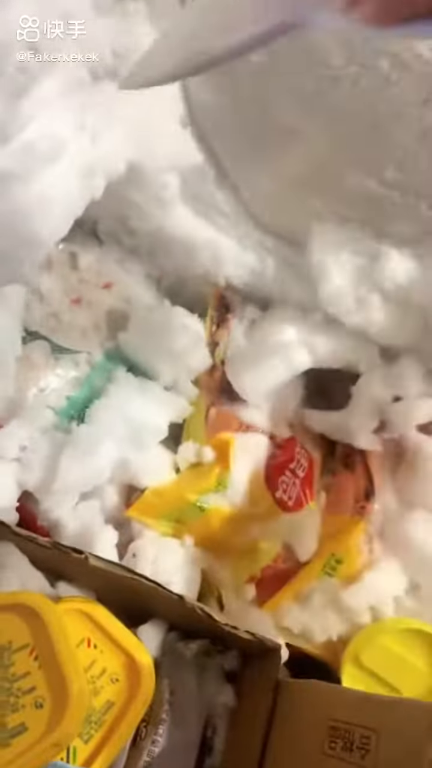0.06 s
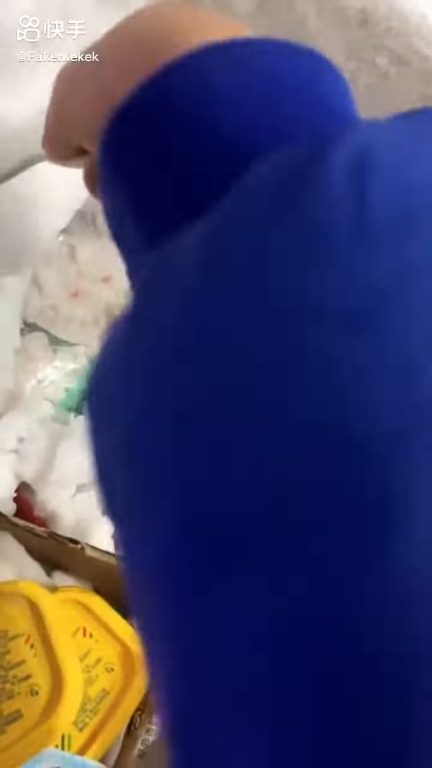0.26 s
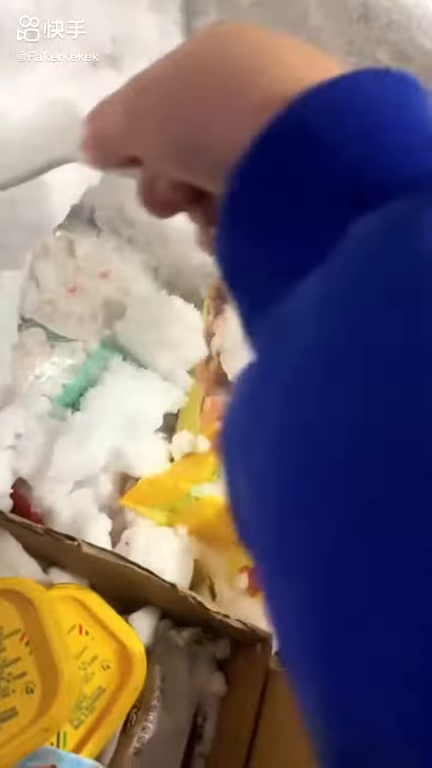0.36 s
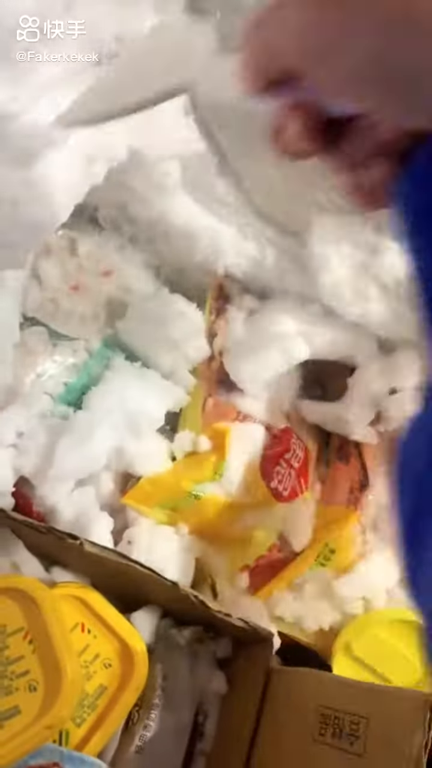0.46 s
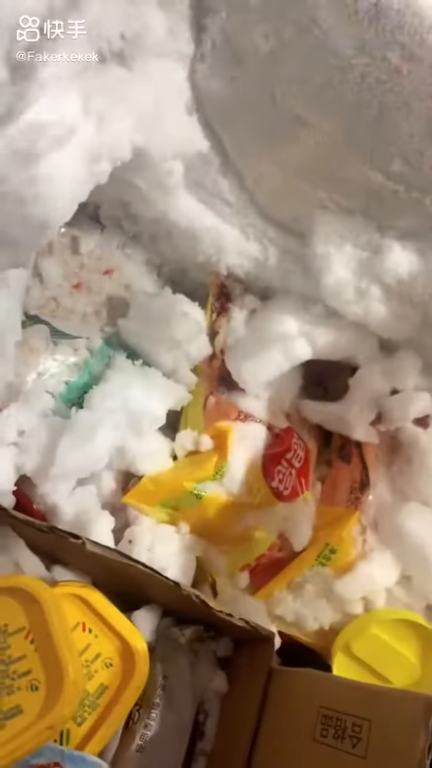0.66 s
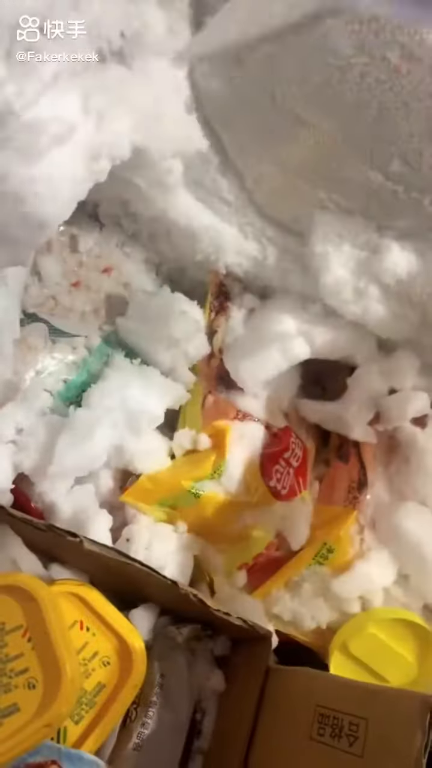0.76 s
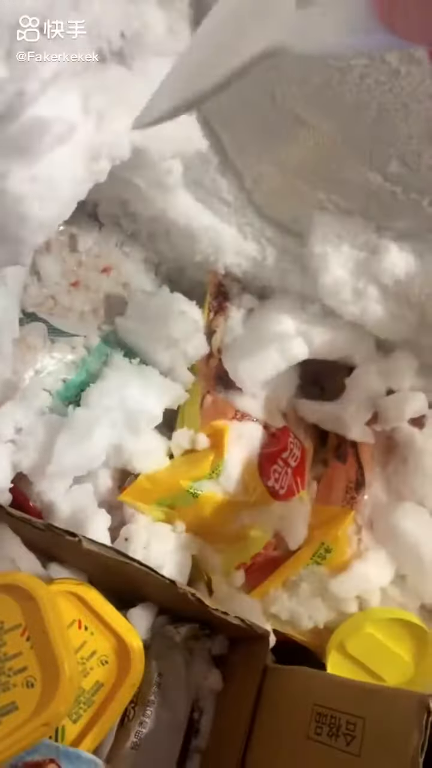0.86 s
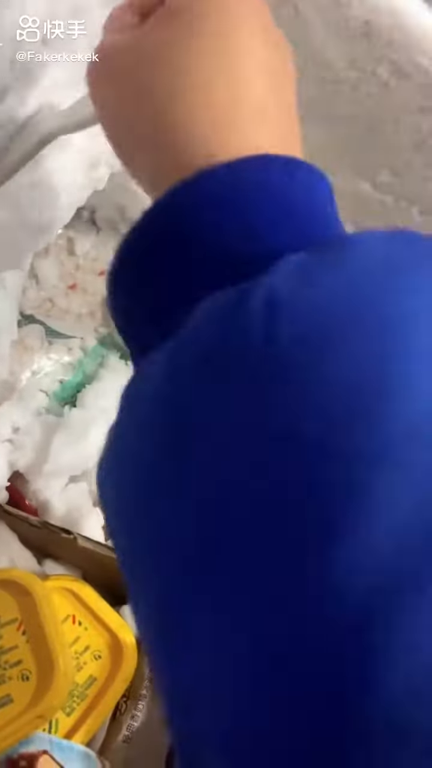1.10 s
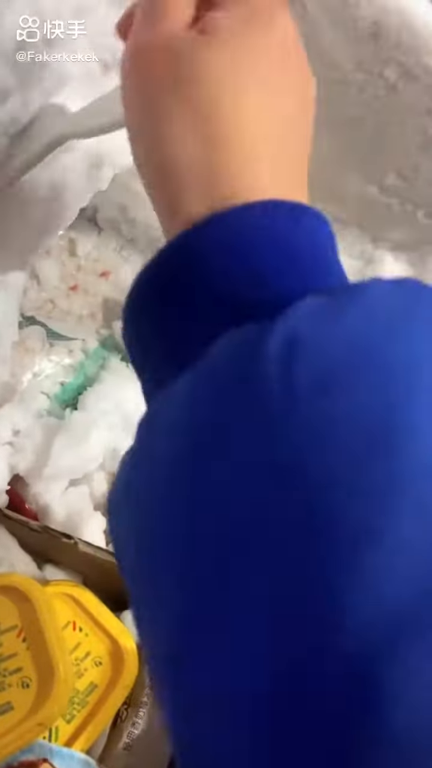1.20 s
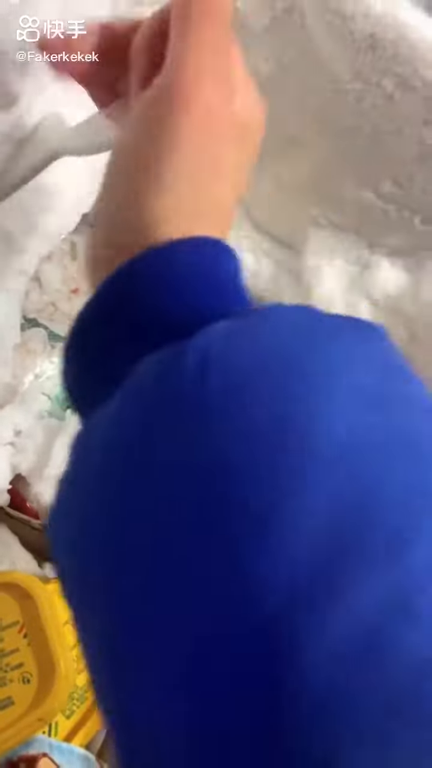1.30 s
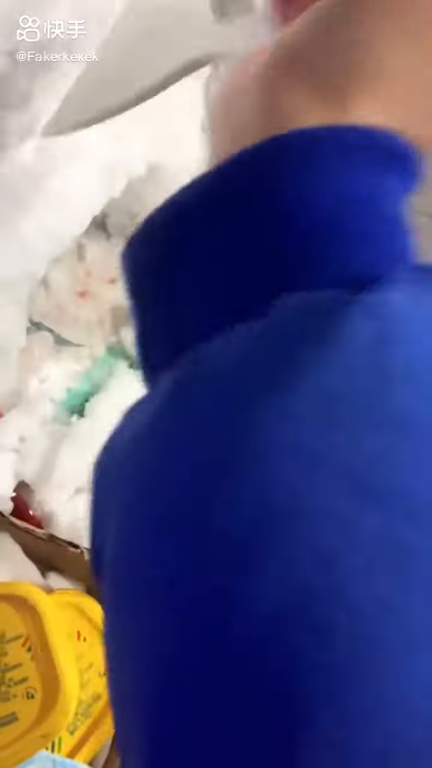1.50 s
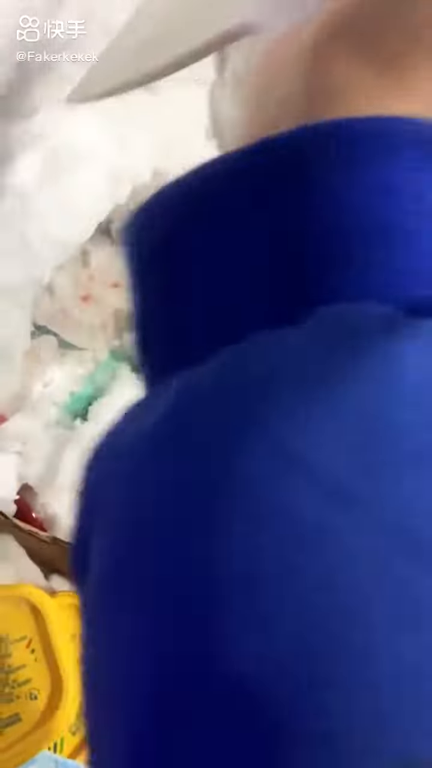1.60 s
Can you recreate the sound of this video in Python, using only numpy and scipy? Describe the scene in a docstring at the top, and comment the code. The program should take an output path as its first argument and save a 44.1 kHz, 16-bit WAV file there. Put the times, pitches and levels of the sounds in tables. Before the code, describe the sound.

A plastic scraper crunches frost inside a freezer, very close to a phone microphone; a sharp jab knocks the liner with a low boom, grinding fades to a pause, then another jab and crunchy drags.

```python
"""A plastic scraper works on thick frost inside a chest freezer, heard close by a phone's two ports.
First comes crunching from thousands of random snaps, then a hard jab knocks the liner and the wall booms.
More grinding leads to a pause: crumbs trickle, a thin whine passes and the cabinet hums low.
A second jab and crunchy drags follow, then it quietens. Clicks and noise make the liner and wall ring;
a faint hiss runs throughout."""
import sys
import numpy as np
from scipy import signal
from scipy.fft import rfft, irfft, next_fast_len
from scipy.io import wavfile

SR = 44100
rng = np.random.default_rng(int(sys.argv[2]) if len(sys.argv) > 2 else 0)


def digitize_waveform(pressure):
    """Quantize a signal to 16-bit integers and store it at the path in sys.argv[1].

    Rows of a 2-D input are taken as channels; values are limited to [-1, 1].
    """
    field = np.atleast_2d(pressure).T
    bounded = np.clip(field, -1, 1)
    quanta = np.round(bounded * 32767).astype(np.int16)
    wavfile.write(sys.argv[1], SR, quanta)


N = 72765  # length in samples

# The edge crushing frost: time_s, crunch_level_db, treble_above_4khz_db, blade_ring_db
STROKES = [(0, -32.5, -0.5, -5), (.012, -31.5, 0.5, -11.5), (.036, -44.5, 9.5, -2.5), (.2, -45, 1.5, -7),
           (.228, -36.5, -4.5, -6), (.237, -19.5, 3.5, -19.5), (.25, -19.5, 5, 2), (.262, -27, -13, -13),
           (.28, -38, -1, 0), (.302, -36, 1.5, -2), (.328, -49.5, 7, -3), (.352, -42, 8.5, -2),
           (.39, -34.5, 3, -6), (.425, -38, 3, -7.5), (.45, -44.5, 3.5, -5), (.52, -52, 7.5, 0),
           (.65, -55.5, 2, 4), (.75, -51, 2, 1), (.81, -47, -15, -4.5), (.87, -56.5, -17, 4),
           (1.06, -60, -6, 4.5), (1.092, -54, 12.5, 12), (1.099, -23.5, 5.5, -1.5), (1.128, -25.5, 6, -6),
           (1.14, -30, 4, 6), (1.17, -34, 0.5, -17), (1.21, -35.5, -1, -2.5), (1.25, -37, -1, 0),
           (1.268, -47.5, 7, 0.5), (1.3, -45, 11, -17), (1.36, -39.5, 8.5, -10), (1.39, -37, 8.5, -1),
           (1.408, -35.5, 9.5, 6), (1.445, -33, 1, -3), (1.475, -31.5, 5.5, -6.5), (1.515, -31, 4, -10),
           (1.53, -45.5, 4, -21), (1.58, -52.5, -3.5, -22), (1.65, -54, 6, 1)]
# Colour of snapping frost: pitch_hz, level_db (per Hz)
FROST_COLOUR = [(500, -1), (900, 1), (1400, 4.5), (2500, 0.5), (4000, -2.5), (6000, -8.5), (9000, -7),
                (12000, -10.5), (13100, -9.5), (13800, -37)]
# What the plastic blade rings with: pitch_hz, level_db, fade_by_60db_s
BLADE_MODES = [(854.4, 5.5, 0.064), (1416, -0.5, 0.17), (1370, -20.5, 0.049), (1705, -2.5, 0.086),
               (2174, 5.5, 0.026), (3350, 0, 0.066), (4050, -19, 0.0067)]
SNAPS_PER_S, SNAP_SPREAD_DB = 9000, 2.5
# Crusts give way in bursts that start sharply and die; level is over the even grind
BURSTS_PER_S, BURST_T60_S, BURST_DB = 200, .015, -10
# Each crystal size comes and goes on its own
PATCH_DEPTH_DB, PATCH_RATE_HZ = 2.4, 16

# Small chips break free at random under the edge; their level is relative to the crunch
CHIPS_PER_S, CHIP_CYCLES, CHIPS_DB = 250, 80., -2
CHIP_LOW_HZ, CHIP_HIGH_HZ = 1000., 9000.

# Single loud cracks of ice, each freeing a chip: start_s, burst_level_db, chip_pitch_hz, chip_ring_db
ICE_CRACKS = [(.2358, -15, 2216, -20), (.2385, -14, 1702, -19), (.2485, -16, 7480, -22),
              (.302, -26, 4700, -36), (.347, -34, 6100, -42), (.375, -40, 1500, -38),
              (.682, -39, 6200, -50), (.7262, -30, 6700, -42), (.7497, -42, 6600, -48),
              (1.0985, -14, 3895, -24), (1.101, -24, 6950, -26), (1.104, -30, 2280, -28),
              (1.110, -32, 1660, -28), (1.116, -34, 885, -30), (1.141, -27, 1400, -34),
              (1.2155, -32, 1470, -38), (1.242, -29, 1540, -32), (1.2835, -34, 2300, -44),
              (1.3118, -37, 2110, -42), (1.3986, -27, 1630, -34), (1.4101, -32, 1420, -26),
              (1.462, -34, 1450, -30), (1.479, -32, 2200, -32), (1.501, -25, 2300, -30),
              (1.5145, -26, 1850, -29)]
CRACK_T60_S, CRACK_ABOVE_HZ, CRACK_CHIP_T60_S = .008, 3000., .06

# What the plastic liner rings with: pitch_hz, level_db, fade_by_60db_s
LINER_MODES = [(178, -5, 0.047), (226, -2.5, 0.061), (301.3, -1, 0.035), (408, -4, 0.048),
               (491, -5.5, 0.033), (605.5, -1.5, 0.045), (700, -20, 0.026)]
# Rumble of the liner under the edge: time_s, level_db
LINER_RUMBLE = [(0, -36), (.03, -48.5), (.1, -61.5), (.23, -58), (.245, -23.5), (.26, -15), (.272, -46),
                (.33, -39.5), (.355, -63), (.39, -43), (.425, -44), (.45, -57.5), (.7, -58.5), (.76, -51),
                (.82, -56.5), (.88, -60), (1.085, -60), (1.102, -28), (1.122, -29.5), (1.17, -43.5),
                (1.215, -48), (1.25, -34), (1.27, -45.5), (1.305, -48.5), (1.385, -47.5), (1.41, -44.5),
                (1.445, -40), (1.475, -42), (1.512, -37.5), (1.538, -47), (1.65, -58)]
# The edge knocks on the liner through the frost: start_s, level_db, contact_passes_up_to_hz
LINER_KNOCKS = [(.2415, -24, 500), (.2462, -20, 600), (.2478, -21, 2000), (.2545, -18, 2000),
                (.2586, -11, 1500), (.757, -40, 350), (.803, -45, 1500), (1.104, -30, 300),
                (1.1125, -26, 150), (1.1212, -23, 150), (1.236, -39, 2000), (1.2444, -37, 2000),
                (1.259, -37, 200), (1.37, -37, 250), (1.437, -33, 200), (1.505, -36, 1200)]

# The wall booms after the hard jab until the arm leans on it
BOOM_START_S, BOOM_STOP_S, BOOM_RELEASE_S = .2685, .304, .008
BOOM_DB = -10  # strength of the push
# The two tones of the boom: pitch_hz, level_db, fade_by_60db_s
BOOM_MODES = [(72, 0, .35), (123.5, -8.5, .26)]
# Shaking of the cabinet wall: time_s, level_db
WALL_SHAKE = [(0, -43), (.05, -42.5), (.2, -48.5), (.31, -29.5), (.36, -36), (.40, -35), (.46, -37.5),
              (.52, -46), (.8, -46.5), (1.08, -48), (1.12, -27), (1.17, -36), (1.22, -46), (1.27, -37),
              (1.31, -44.5), (1.39, -39), (1.42, -49.5), (1.47, -36.5), (1.51, -55), (1.62, -43),
              (1.65, -41)]
# Tones of the shaking wall: pitch_hz, level_db, fade_by_60db_s
WALL_MODES = [(37.3, -8, 0.62), (72.2, -3, 0.19), (85.6, -6, 0.29), (124.6, -3.5, 0.063)]
BASS_CUT_HZ = 49.4  # the wall radiates little below this

# A thin faint whine in the pause: time_s, level_db
WHINE_LEVEL = [(.69, -85), (.72, -60), (.77, -61), (.82, -53), (.84, -85)]
WHINE_HZ, WHINE_T60_S = 1330, 0.25

# Colour of the faint hiss of the surroundings: pitch_hz, level_db (per Hz)
AIR_COLOUR = [(200, 20), (500, -16), (1300, 15.5), (2200, -34), (4000, 6), (7000, -13), (12000, -42)]
AIR_DB = -52

# Ports hear alike (+1) or in opposite phase (-1): pitch_hz, likeness (no unit)
PORT_LIKENESS = [(150, 0.98), (400, 0.73), (800, -0.69), (1250, -0.82), (1600, -0.14), (4000, -0.3),
                 (4450, -0.96), (5600, -0.79), (6050, 0.74), (7550, 0.28), (8200, -0.67), (9500, -0.93),
                 (9950, 1), (10500, -0.66), (11700, -0.82), (12400, 1), (13200, 0.76)]
# Below this pitch, this share of the port difference is sound reaching the right port first
LAG_BELOW_HZ, LAG_SHARE = 1900, 0.57
CUTOFF_HZ = 14240


def from_db(db):
    """Turn decibels into a multiplier."""
    return 10 ** (np.asarray(db) / 20)


def rms_one(x):
    """Scale to an average (rms) strength of 1."""
    return x / np.sqrt(np.mean(x ** 2) + 1e-20)


def in_time(rows):
    """Draw straight lines between table rows, giving each column a value per sample."""
    time_s, *columns = np.transpose(rows)
    return [np.interp(np.arange(N) / SR, time_s, column) for column in columns]


def fade_step(t60_s):
    """Multiplier per sample that fades a sound by 60 dB in the given time."""
    return from_db(-60 / (t60_s * SR))


def high_pass(x, hz):
    """Keep what lies above a pitch."""
    return signal.sosfilt(signal.butter(2, hz, "high", fs=SR, output="sos"), x)


def coloured(x, gain):
    """Multiply each frequency by its gain."""
    size = next_fast_len(N + 4096)  # spare room for the filter's tail
    hz = np.maximum(np.arange(size // 2 + 1) * SR / size, 1)
    return irfft(rfft(x, size) * gain(hz), size)[..., :N]


def table_coloured(x, rows, floor_db):
    """Colour by a table of pitch and level; below its first pitch the floor applies."""
    hz, db = np.transpose(rows)
    return coloured(x, lambda f: from_db(np.interp(np.log(f), np.log(hz), db, left=floor_db)))


def drift(rate_hz):
    """Slow random wandering: smoothed noise with an rms of 1 over its run."""
    r = np.exp(-2 * np.pi * rate_hz / SR)
    noise = rng.standard_normal(N + SR)
    return rms_one(signal.lfilter([1], [1, -2 * r, r * r], noise)[SR:])  # skip the start-up second


def ring(x, modes):
    """An object rings as a sum of fading tones set going by x, with alternating signs."""
    out = 0
    for k, (hz, db, t60_s) in enumerate(modes):
        r, w = fade_step(t60_s), 2 * np.pi * hz / SR
        strike = [0, from_db(db) * np.sin(w)]
        tone = signal.lfilter(strike, [1, -2 * r * np.cos(w), r * r], x + 1e-18)
        out = out + (-1) ** k * tone
    return out


def clicks(rows):
    """One single-sample click per row of start and level."""
    out = np.zeros(N)
    for start_s, level_db in rows:
        out[int(start_s * SR)] = from_db(level_db)
    return out


def crunch(level_db, treble_db, blade_db):
    """Frost crystals snap in dense bursts, heard bare and through the ringing blade."""
    starts = (rng.random(N) < BURSTS_PER_S / SR) * np.minimum(rng.exponential(1, N), 3)
    bursts = 1 + from_db(BURST_DB) * signal.lfilter([1], [1, -fade_step(BURST_T60_S)], starts)
    sizes = bursts * from_db(SNAP_SPREAD_DB * np.minimum(rng.exponential(1, N), 5))
    # The two paths share snap times and sizes, but each draws its own sign and strength
    snaps = sizes * (rng.random(N) < SNAPS_PER_S / SR) * rng.standard_normal((2, N))
    edges = np.geomspace(400, 15000, 21)
    by_size = 0
    for band in zip(edges, edges[1:]):  # one pitch band per crystal size
        band_filter = signal.butter(2, band, "band", fs=SR, output="sos")
        patches = from_db(PATCH_DEPTH_DB * drift(PATCH_RATE_HZ))
        by_size = by_size + patches * signal.sosfilt(band_filter, snaps)
    bare = rms_one(table_coloured(by_size, FROST_COLOUR, -60))
    treble_change = (from_db(treble_db) - 1) * high_pass(bare, 4000.)
    blade = from_db(blade_db) * rms_one(ring(snaps, BLADE_MODES))
    return from_db(level_db) * (bare + treble_change + blade)


def chips(level_db):
    """Chips break free at random, each ringing at one of 36 pitches and fading over a set count of cycles."""
    strength = rng.exponential(1, N) * rng.standard_normal((2, N))
    freed = (rng.random(N) < CHIPS_PER_S / SR) * strength
    pitches = np.geomspace(CHIP_LOW_HZ, CHIP_HIGH_HZ, num=36)
    dealt = rng.integers(0, 36, N)
    rings = 0
    for k, hz in enumerate(pitches):
        rings = rings + ring(freed * (dealt == k), [(hz, 0, CHIP_CYCLES / hz)])
    return from_db(level_db + CHIPS_DB) * rms_one(rings)


def cracks():
    """Breaking ice gives a short bright burst of fading noise plus the ring of its chip."""
    starts = clicks([row[:2] for row in ICE_CRACKS])
    fading = signal.lfilter([1], [1, -fade_step(CRACK_T60_S)], starts)
    out = high_pass(fading * rng.standard_normal((2, N)), CRACK_ABOVE_HZ)
    for start_s, _, hz, ring_db in ICE_CRACKS:
        out = out + ring(clicks([(start_s, ring_db)]), [(hz, 0, CRACK_CHIP_T60_S)])
    return out


def liner():
    """The liner rings under the scrape and at each knock; soft contacts wake mostly the low tones."""
    rumble_db, = in_time(LINER_RUMBLE)
    rumble = from_db(rumble_db) * rms_one(ring(rng.standard_normal((2, N)), LINER_MODES))
    push = 0
    for start_s, level_db, contact_hz in LINER_KNOCKS:
        r = np.exp(-2 * np.pi * contact_hz / SR)
        push = push + signal.lfilter([1 - r], [1, -r], clicks([(start_s, level_db)]))
    return rumble - ring(push, LINER_MODES) * [[1], [0]]  # knocks only in the shared path


def boom():
    """One push makes the wall ring low, until the leaning arm damps it."""
    t = np.arange(N) / SR
    damp = np.exp(-np.maximum(t - BOOM_STOP_S, 0) / BOOM_RELEASE_S)
    return damp * ring(clicks([(BOOM_START_S, BOOM_DB)]), BOOM_MODES)


def shaking():
    """Noise keeps the wall's low tones going, as a hum that swells and sinks."""
    shake_db, = in_time(WALL_SHAKE)
    return from_db(shake_db) * rms_one(ring(rng.standard_normal(N + SR), WALL_MODES)[SR:])


def wall():
    """The wall sends out its boom and shaking, but little of the deepest bass."""
    return coloured(boom() + shaking(), lambda f: 1 / np.sqrt(1 + (BASS_CUT_HZ / f) ** 6))


def whine():
    """Noise passed twice through one narrow resonance becomes a wavering thin tone."""
    mode = [(WHINE_HZ, 0, WHINE_T60_S)]
    tone = ring(ring(rng.standard_normal(N), mode), mode)
    return from_db(in_time(WHINE_LEVEL)[0]) * rms_one(tone)


def air():
    """Steady coloured noise gives the faint hiss of the surroundings."""
    return from_db(AIR_DB) * rms_one(table_coloured(rng.standard_normal((2, N)), AIR_COLOUR, -40))


def ports(paths):
    """Path one is shared; path two, and in the lows a phase-shifted path one, has opposite signs at the ports."""
    hz, alike = np.transpose(PORT_LIKENESS)

    def apart(f):
        return np.sqrt(1 - np.clip(np.interp(f, hz, alike), -1, 1))

    def lag(f):
        return LAG_SHARE / (1 + (f / LAG_BELOW_HZ) ** 8)

    mid = coloured(paths[0], lambda f: np.sqrt(2 - apart(f) ** 2))
    side = coloured(paths[1], lambda f: apart(f) * np.sqrt(1 - lag(f)))
    # -1j shifts the phase by a quarter turn
    side = side + coloured(paths[0], lambda f: -1j * apart(f) * np.sqrt(lag(f)))
    return np.array([mid + side, mid - side]) / np.sqrt(2)


def scene():
    """Scraper, ice, liner and air pass the two ports; the wall's bass and the whine reach both alike."""
    level_db, treble_db, blade_db = in_time(STROKES)
    near = crunch(level_db, treble_db, blade_db) + chips(level_db) + cracks() + liner()
    return ports(near + air()) + wall() + whine()


def record(dry):
    """A steep filter cuts the top of the treble."""
    return signal.sosfilt(signal.cheby2(12, 70, CUTOFF_HZ, fs=SR, output="sos"), dry)


dry = scene()
out = record(dry)
digitize_waveform(out)
```